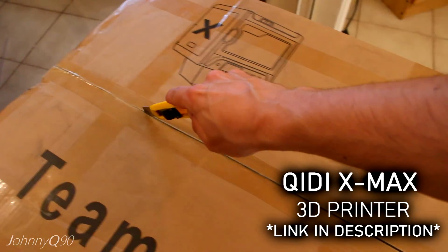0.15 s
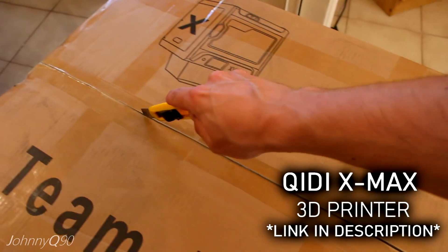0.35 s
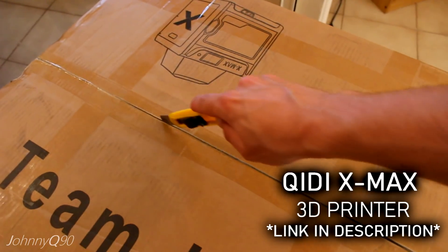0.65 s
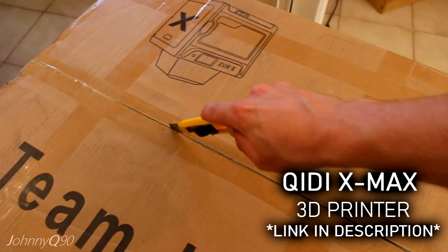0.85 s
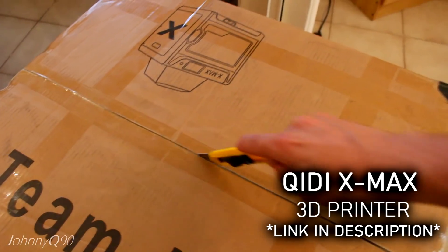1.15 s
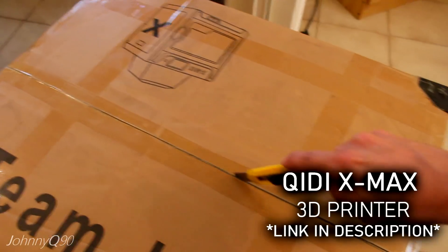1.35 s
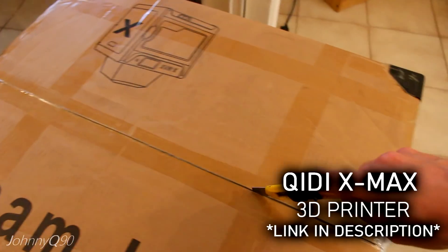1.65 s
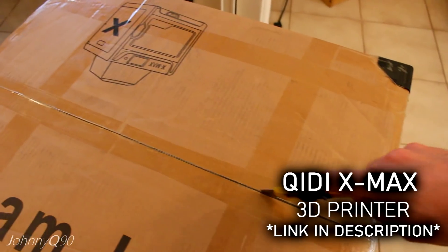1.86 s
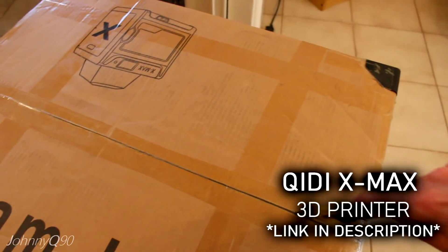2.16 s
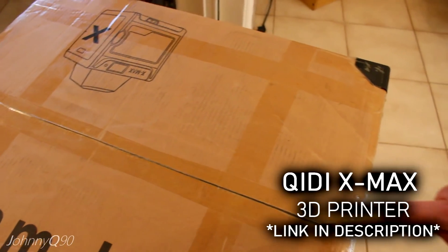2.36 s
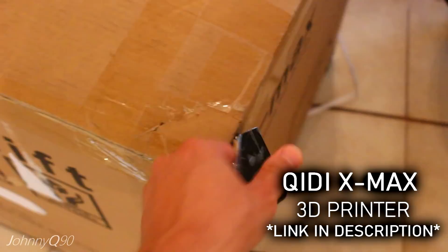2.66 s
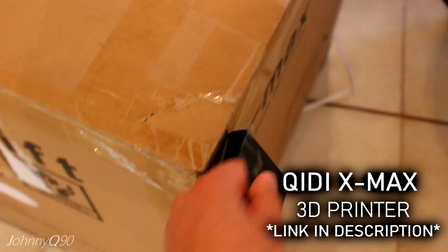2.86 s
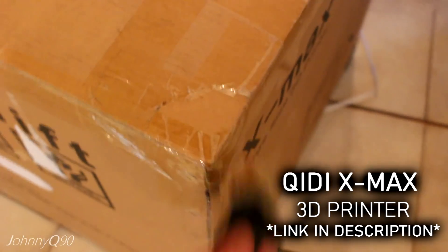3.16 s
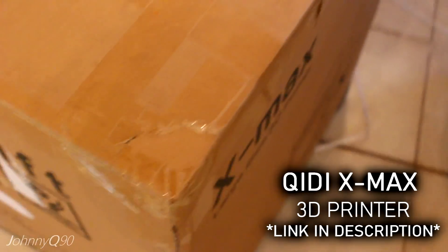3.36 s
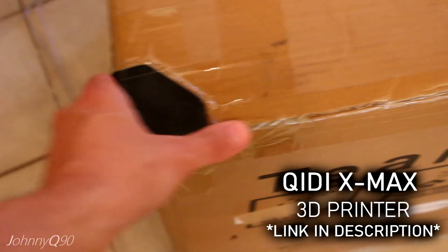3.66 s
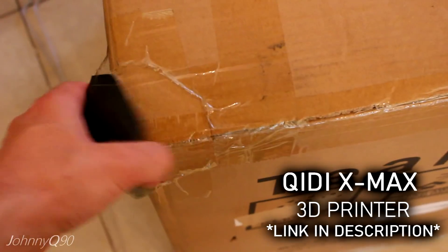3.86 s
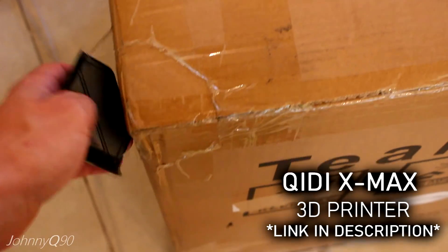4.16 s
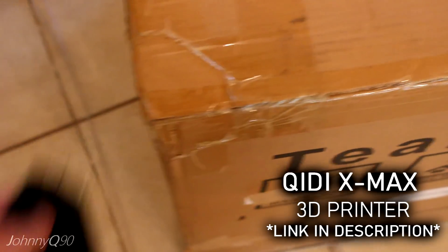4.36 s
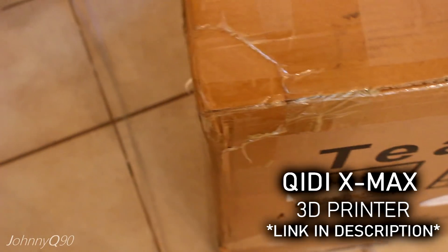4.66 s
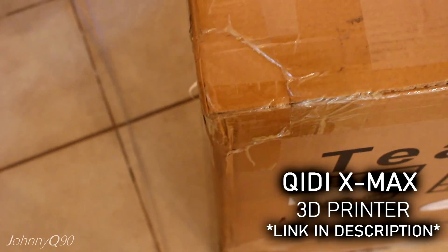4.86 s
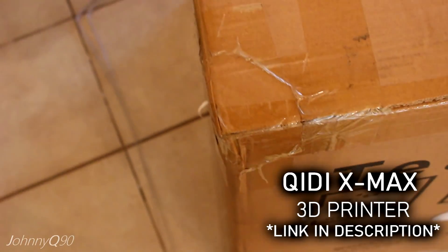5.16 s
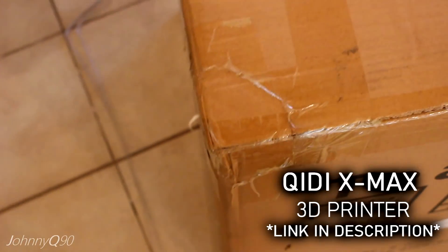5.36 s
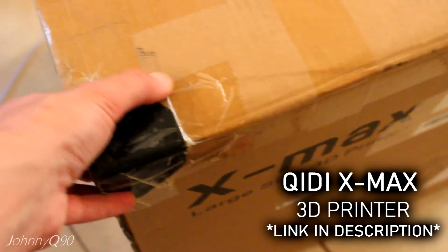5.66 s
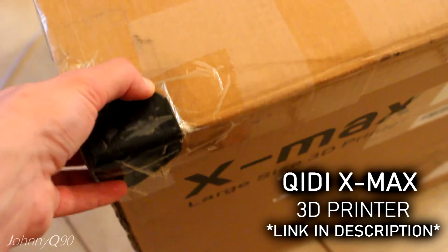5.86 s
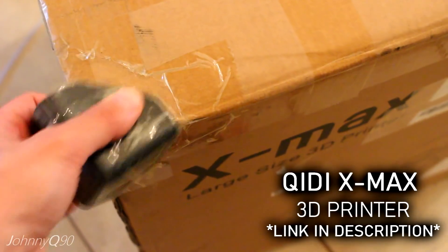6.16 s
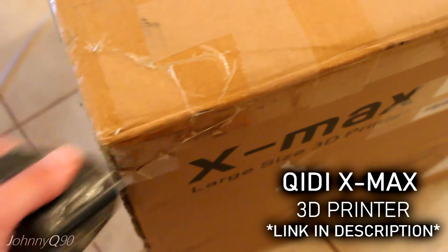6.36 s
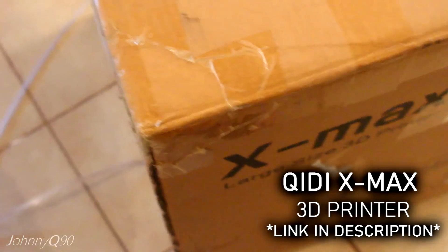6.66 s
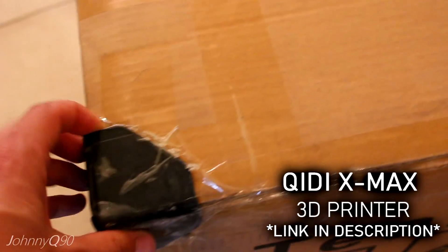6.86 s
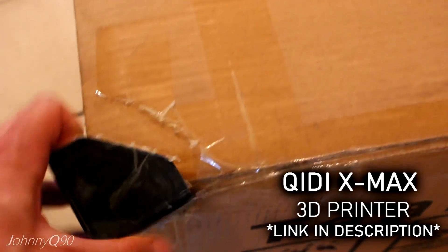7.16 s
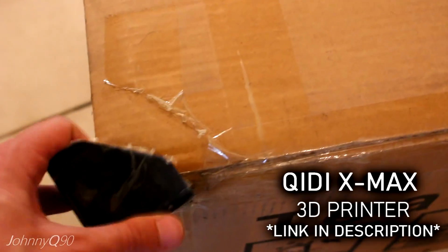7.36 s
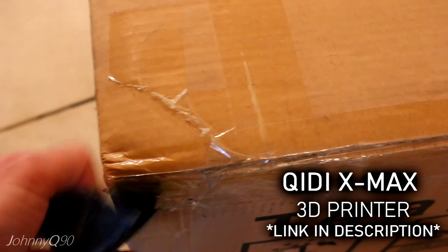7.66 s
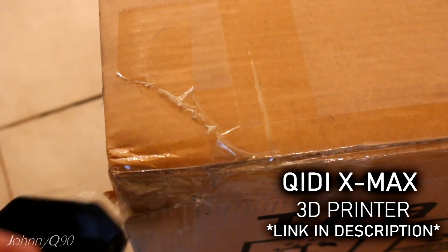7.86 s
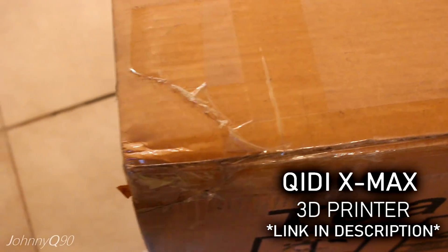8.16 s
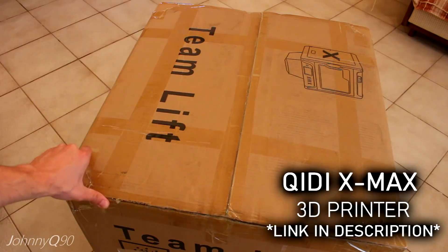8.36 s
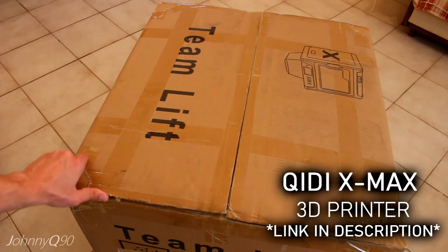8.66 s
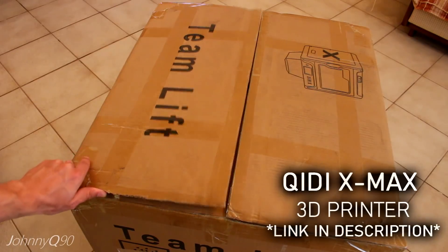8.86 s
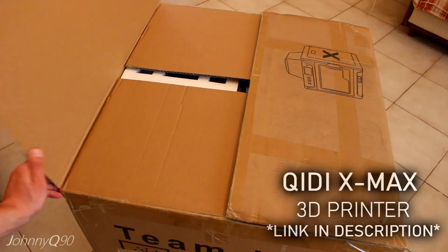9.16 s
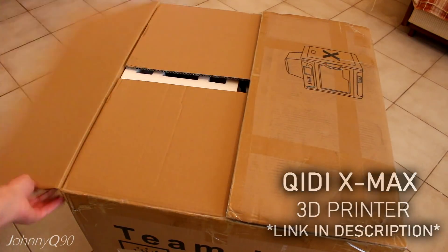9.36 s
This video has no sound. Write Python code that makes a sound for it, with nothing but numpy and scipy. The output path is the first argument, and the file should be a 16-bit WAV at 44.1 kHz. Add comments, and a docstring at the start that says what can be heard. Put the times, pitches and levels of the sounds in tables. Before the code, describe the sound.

In a small, slightly echoing tiled room, a blade rasps through packing tape and makes a large carton thrum. Next come close, crackling rips as four plastic corner protectors are pulled away one after another, some loud and some gentle, amid rustling tape and dull cardboard bumps. A flap then knocks and creaks open. Faint hiss and low rumble lie underneath.

```python
"""A knife slits the taped seam of a big cardboard carton in a tiled room: fibres and tape part in tiny
slips that make lid and blade ring. Four plastic corner guards are then torn off their packing tape in
bursts of sharp snaps, with crinkling tape and hollow knocks from the carton. Last, a flap is pulled
open and creaks. Faint hiss and rumble lie underneath. Five times the level dips briefly and the echo
is cut off."""
import sys
import numpy as np
from scipy import signal
from scipy.io import wavfile

SR = 44100
rng = np.random.default_rng(int(sys.argv[2]) if len(sys.argv) > 2 else 0)


def unload_wav(signal):
    """Save mono or channel-first audio to the path in sys.argv[1] as 16-bit WAV at rate SR, clipped to [-1, 1]."""
    wavfile.write(
        sys.argv[1],
        SR,
        np.round(np.clip(np.atleast_2d(signal).T, -1, 1) * 32767).astype(np.int16),
    )


N = 418950

# The tones that a guard, the tape film, its edge and the carton ring with: pitch_hz, width_hz, level_db
# (a wider tone dies away sooner)
GUARD_TONES = [(1159, 450, -7.5), (1646, 320, -3), (2070, 230, -7.5)]
FILM_TONES = [(2710, 1800, -4), (3750, 430, -3.5), (5070, 1700, 0.5), (5820, 610, -5)]
EDGE_TONES = [(7330, 470, -9), (8780, 440, -0.5), (11200, 5900, -12.5), (13400, 730, -9.5)]
CARTON_TONES = [(127, 34, -20), (187, 82, -10), (390, 200, -7.5), (674, 200, -4.5), (900, 320, -8.5)]
# Moments when the level dips and the echo stops: time_s
DIPS = [2.7256, 3.724, 5.628, 6.793, 8.296]


def amp(db):
    """Turn decibels into a gain to multiply by."""
    return 10 ** (np.asarray(db) / 20)


def unit_level(x):
    """Scale a signal to an average (rms) level of 1."""
    return x / np.sqrt(np.mean(x ** 2) + 1e-20)


def filtered(x, order, hz, kind):
    """Keep the "low" side, the "high" side or a "band" of a sound."""
    return signal.sosfilt(signal.butter(order, hz, kind, fs=SR, output="sos"), x)


def gain_curves(rows):
    """Join rows of a time and levels into gain curves, silent before and after."""
    times, *columns = np.transpose(rows)
    return [amp(np.interp(np.arange(N) / SR, times, db, left=-200, right=-200)) for db in columns]


def at_pitch(points, hz):
    """Read a value between the rows of a table, with pitch spaced in octaves."""
    pitches, values = np.transpose(points)
    return np.interp(np.log(hz), np.log(pitches), values)


def drift(rate_hz):
    """A smooth random wander, about 1 in size."""
    r = np.exp(-2 * np.pi * rate_hz / SR)
    return unit_level(signal.lfilter([1], [1, -2 * r, r * r], rng.standard_normal(N + SR))[SR:])


def ring(clicks, hz, width):
    """Each click starts a tone that dies away."""
    r, w = np.exp(-np.pi * width / SR), 2 * np.pi * hz / SR
    return signal.lfilter([.5, 0, -.5], [1, -2 * r * np.cos(w), r * r], clicks + 1e-18)


def resonate(drive, tones, wander_db):
    """Slips set an object's tones ringing; each slip grips each tone differently."""
    out = 0
    for hz, width, db in tones:
        strength = amp(db + wander_db * drift(3.0)) * width
        out += strength * ring(drive * rng.standard_normal(N), hz, width)
    return unit_level(out)


def slips(per_s, spread_db, clump_db, clump_hz):
    """Tiny random clicks of uneven size that swell in clumps."""
    sizes = amp(spread_db * np.minimum(rng.exponential(1, N), 4)) * rng.choice([-1, 1], N)
    happens = rng.random(N) < per_s / SR
    return unit_level(sizes * happens * amp(clump_db * drift(clump_hz)))


def strike(times, hit_db, tones, spread_db, detune, contact_s, ragged):
    """Each blow is a click with a ragged trail; every tone rings with its own strength and tuning."""
    starts, t = np.round(times * SR).astype(int), np.arange(2500) / SR
    out, luck = np.zeros(N + len(t)), rng.standard_normal((len(starts), len(tones), 92))
    for k, (hz, width, db) in enumerate(tones):
        contact = ragged * luck[:, k, 2:] * np.exp(-t[:90] / contact_s)
        contact[:, 0] = np.sign(contact[:, 0])
        pitch = np.minimum(hz * np.exp(detune * luck[:, k, 1:2]), .4 * SR)
        rings = np.exp(-np.pi * width * t) * np.cos(2 * np.pi * pitch * t)
        rings = signal.fftconvolve(rings, contact, axes=1)[:, :len(t)]
        strength = amp(hit_db + db + spread_db * luck[:, k, 0])
        np.add.at(out, starts[:, None] + np.arange(len(t)), strength[:, None] * rings)
    return out[:N]


def shaped_noise(length, gain_at):
    """Noise split into half-octave bands, each scaled by gain_at(hz)."""
    white, edges = rng.standard_normal((2, length)), 60 * 2 ** np.arange(0, 8.6, .5)
    bands = zip(edges, np.minimum(edges[1:], .47 * SR))
    return sum(gain_at(np.sqrt(low * high)) * filtered(white[k % 2], 3, [low, high], "band")
               for k, (low, high) in enumerate(bands))


def knife():
    """Fibres and tape part in dense slips; the ringing changes as the blade moves along the seam."""
    # Carton thrum, tape rasp and blade scratch: time_s, thrum_db, rasp_db, scratch_over_rasp_db
    slit = [(0.0, -49.5, -62.5, 3.5), (0.3, -51, -61, 4.5), (0.5, -47.5, -57, 1), (0.85, -49, -60.5, -3.5),
            (1.1, -52.5, -54, -6.5), (1.24, -44.5, -60, -2), (1.33, -46, -53.5, -4.5),
            (1.44, -50.5, -55.5, -1), (1.52, -49.5, -51.5, 0), (1.64, -48, -58, -4.5),
            (1.85, -50.5, -58.5, -5), (2.0, -43, -52.5, -1.5), (2.45, -48.5, -50, -3.5),
            (2.53, -50, -48, -3), (2.59, -39.5, -47, 3.5)]
    # The blade catches and tears through a cross strip: start_s, rise_s, thrum_db, scratch_db, rasp_db
    snags = [(1.137, 0.0036, -29, -63, -26.5), (1.147, 0.0028, -28, -45, -64),
             (1.167, 0.0046, -34, -69, -61), (1.653, 0.0013, -30.5, -39, -44),
             (2.595, 0.0025, -39, -36, -24)]
    # Tones of lid and blade at the two ends of the seam: pitch_hz, width_hz, level_db
    start_tones = [(94, 22, 11), (132, 39, 15.5), (378, 130, -0.5), (706, 630, -31), (1460, 720, -22.5),
                   (2380, 310, -11), (3100, 370, -11), (4600, 380, -24.5), (5650, 210, -22),
                   (6360, 1700, -41), (7700, 700, -26.5), (9180, 420, -22.5), (13300, 840, -31)]
    end_tones = [(172, 81, 0), (394, 62, 1), (620, 115, -3), (1450, 1540, -23.5), (2130, 150, -17.5),
                 (3610, 330, -17), (5050, 270, -20), (6220, 200, -16.5), (6500, 2900, -30.5),
                 (8430, 690, -19.5), (12900, 2500, -36)]
    # Pitch ranges of thrum, scratch and rasp: low_hz, high_hz
    ranges = [(60, 1000), (1000, 3400), (3400, 16000)]
    t = np.arange(N) / SR
    along = np.clip(t / slit[-1][0], 0, 1)
    thrum, rasp, scratch = gain_curves(slit)
    levels = np.array([thrum, rasp * scratch, rasp])
    for start_s, rise_s, *db in snags:
        rise = np.clip((t - start_s) / rise_s, 0, None)
        levels += amp(db)[:, None] * rise * np.exp(1 - rise)
    cutting = slips(per_s=9000, spread_db=2.1, clump_db=1.6, clump_hz=70)
    cutting += .6 * slips(per_s=120, spread_db=3.0, clump_db=2.5, clump_hz=10)
    out = 0
    for gain, (low, high) in zip(levels, ranges):
        start, end = (resonate(cutting, [tone for tone in tones if low < tone[0] < high], wander_db=3.6)
                      for tones in (start_tones, end_tones))
        out += gain * (np.sqrt(1 - along) * start + np.sqrt(along) * end)
    return out


def background():
    """Faint room hiss, and a lumpy rumble that drops away at the last dip."""
    # How the hiss is spread from bass to treble: pitch_hz, level_db
    hiss_shape = [(41, -32), (70, 0), (1140, -10), (1460, -7.5), (2010, -13), (11700, -14.5),
                  (15100, -25.5), (16500, -26.5)]
    hiss = unit_level(shaped_noise(N, lambda hz: amp(at_pitch(hiss_shape, hz))))
    rumble = unit_level(filtered(rng.standard_normal(N), 6, 35.2, "low"))
    rumble *= np.where(np.arange(N) < DIPS[-1] * SR, 1, amp(-22))
    return amp(-74) * hiss + amp(-70) * rumble


def carton_knocks():
    """Jolts make the carton wall ring; its two lowest tones give a hollow boom."""
    # Jolts to the wall: start_s, wall_db, boom_over_wall_db
    jolts = [(1.137, -18, -15), (1.651, -26.5, -9), (2.905, -24, -20), (3.178, -13.5, 0), (3.22, -7.5, -18),
             (3.287, -13.5, -20), (3.974, -45.5, 4), (4.227, -29.5, -4.5), (4.284, -25.5, -5),
             (5.514, -39, -11.5), (6.041, -34.5, 1), (7.158, -24, -9), (7.293, -28, -6.5), (7.787, -43, -6),
             (7.903, -30, -8), (7.932, -27.5, -10.5), (8.934, -22, 6), (8.992, -20.5, -0.5)]
    times, wall_db, boom_db = np.transpose(jolts)
    wall = strike(times, wall_db, CARTON_TONES[2:], spread_db=2.3, detune=.13, contact_s=.0008, ragged=.2)
    boom = strike(times, wall_db + boom_db, CARTON_TONES[:2],
                  spread_db=1.5, detune=.08, contact_s=.0008, ragged=.15)
    return filtered(wall + boom, 2, [110, 1400], "band")


def hand_effort():
    """How hard hands stir guard, film and wall: a rip holds and stops short, a fumble swells and fades."""
    # Tape tears off in one pull: start_s, length_s, film_db
    rips = [(2.833, 0.053, -51), (2.929, 0.075, -30.5), (3.22, .09, -26.5), (4.258, 0.034, -30.5),
            (7.172, 0.076, -47), (7.905, 0.032, -37), (8.938, 0.096, -45)]
    # Fingers work at guard and tape: middle_s, length_s, film_db, guard_over_film_db
    fumbles = [(2.778, 0.22, -61.5, -6.5), (3.772, 0.29, -70, -5.5), (3.96, 0.22, -57.5, -6),
               (4.15, .15, -67, -6.5), (5.57, .14, -80, 14), (5.785, .17, -70.5, 2.5),
               (6.025, 0.14, -60, 6), (6.23, 0.22, -59, -0.5), (6.414, .12, -64, -1), (6.809, .06, -71, -6),
               (6.95, .2, -73.5, 1.5), (7.073, 0.19, -76, 7.5), (7.43, 0.26, -64, -5.5),
               (7.579, 0.061, -56.5, 2), (7.653, 0.096, -57.5, -1.5), (7.787, .1, -54.5, 4),
               (8.73, .15, -61, -6.5), (8.87, 0.12, -62, -7.5), (9.171, 0.39, -60, -13),
               (9.466, 0.16, -60.5, -17)]
    rise_s, fall_s, swell_ends_db = .006, .008, -14.5
    t, effort = np.arange(N) / SR, 0
    for start_s, length_s, db in rips:
        nearest_end = np.minimum((t - start_s) / rise_s, (start_s + length_s - t) / fall_s)
        pull = np.exp(np.minimum(0, nearest_end))
        effort += amp([db - 4, db, db - 14])[:, None] * pull
    for middle_s, length_s, db, guard_db in fumbles:
        swell = amp(swell_ends_db * (2 * (t - middle_s) / length_s) ** 2)
        effort += amp([db + guard_db, db, db + guard_db - 3])[:, None] * swell
    return effort


def crinkle_and_creak():
    """Sticky film ticks and rubs, stirring guard and carton wall; the wall creaks as the flap bends."""
    # The bending flap: time_s, level_db
    flap_bend = [(8.88, -81), (8.96, -45), (9.1, -57), (9.4, -89.5), (9.5, -61)]
    guard_gain, film_gain, wall_gain = hand_effort()
    ticks = slips(per_s=300, spread_db=3.3, clump_db=3.5, clump_hz=30)
    rub = slips(per_s=9000, spread_db=2.1, clump_db=2.5, clump_hz=18)
    drive = 1.1 * ticks + rub
    wall = (wall_gain + gain_curves(flap_bend)[0]) * resonate(drive, CARTON_TONES, wander_db=2.0)
    guard = guard_gain * resonate(drive, GUARD_TONES, wander_db=3.0)
    film = film_gain * resonate(drive, FILM_TONES + EDGE_TONES, wander_db=2.5)
    return guard + film + wall


def tape_snaps():
    """Tape lets go in pops that briefly ring the guard, the film and its edge."""
    # Each pop (a brighter one has more edge and less guard): start_s, level_db, brightness_db
    pops = [(2.8162, -37.5, 15), (2.8332, -10.5, 14.5), (2.861, -5.5, 14), (2.9044, -5, 9),
            (2.9118, -2.5, 12), (2.9325, -0.5, 8), (2.9365, -12.5, 5), (2.952, -11, 7), (2.9617, -10.5, -3),
            (2.9697, -7.5, 2), (2.9792, -2, 11), (2.9874, -0.5, 32), (2.9923, -5, 16), (3.005, -4.5, 30),
            (3.022, -1.5, 4.5), (3.047, -13.5, 8), (3.0684, -12.5, 7), (3.1532, -3.5, 8.5),
            (3.1612, -18, 15.5), (3.178, 3.5, -6), (3.2196, 3.5, 1), (3.2286, -2.5, -2), (3.234, -12, 0),
            (3.2489, -15.5, 6.5), (3.2697, -15, -1), (3.2874, -11, 5.5), (3.3005, -16, -6),
            (3.5712, -36.5, 13.5), (3.7938, -33, 22.5), (3.8121, -34, 29.5), (3.874, -35.5, 12),
            (3.9012, -38.5, 2.5), (3.916, -35, 14), (3.956, -30, 27.5), (3.9745, -37, -8),
            (3.9847, -31.5, -8), (4.0586, -42, 2.5), (4.078, -48, -8), (4.1139, -36.5, 6),
            (4.1892, -35, 10), (4.2221, -31, 7), (4.2269, -10.5, -3.5), (4.236, -22, 23.5),
            (4.2522, -3, 11.5), (4.2568, -12, 3.5), (4.2694, -5.5, 7), (4.2739, -10.5, 1), (4.284, -5, 4),
            (4.3, -18, -8), (4.394, -35, 9), (5.5149, -36.5, -21), (5.6834, -47, 2.5), (5.9604, -47, 5.5),
            (5.9898, -41, -7), (5.9976, -34, -2), (6.0418, -26, 8.5), (6.056, -42.5, -2), (6.1822, -40, 13),
            (6.233, -41, -2), (6.2448, -31.5, -13), (6.3465, -41, -3), (6.9164, -42, 3),
            (6.9371, -25.5, 22.5), (7.1455, -44, 12.5), (7.1585, -14, -5.5), (7.1763, -11, 8),
            (7.194, -22, -2), (7.2032, -24, 5), (7.2333, -20.5, 8), (7.293, -21, -5.5), (7.537, -39, 10.5),
            (7.587, -23, -9), (7.7152, -32.5, 11), (7.7608, -36, -13), (7.7757, -37.5, -4),
            (7.7832, -39, -0.5), (7.839, -22.5, 11), (7.8459, -27, 13), (7.8722, -19, 21),
            (7.9014, -6.5, 13.5), (7.908, -7.5, 11.5), (7.9169, -13, 5.5), (7.9318, -16, -11),
            (8.6611, -29, 17), (8.865, -43, -7), (8.8885, -31.5, 6), (8.9164, -42, 3), (8.934, -22, -0.5),
            (8.9819, -20, -18), (8.9927, -16, -3), (9.2053, -37, 13), (9.263, -42, 17.5)]
    flap_damping = 1.9   # tape on the flap dies away this many times faster than on a guard
    times, level_db, bright_db = np.transpose(pops)
    guard_db = level_db - 2 - np.maximum(bright_db, 0)
    film_db = level_db - 3 - .3 * abs(bright_db)
    edge_db = level_db - 2.5 + np.minimum(bright_db, 0)
    on_flap, out = times > DIPS[-1], 0
    for chosen, damping in ((~on_flap, 1), (on_flap, flap_damping)):
        for hit_db, tones in ((guard_db, GUARD_TONES), (film_db, FILM_TONES), (edge_db, EDGE_TONES)):
            damped = [(hz, width * damping, db) for hz, width, db in tones]
            out += strike(times[chosen], hit_db[chosen], damped,
                          spread_db=1.5, detune=.06, contact_s=.00052, ragged=.22)
    return filtered(out, 2, 500, "high")   # a small film moves no bass


def tiled_room(dry):
    """One bounce off the floor tiles and a wash of echoes, cut off at each dip."""
    # Time the echo takes to fade by 60 dB: pitch_hz, fade_s
    fade_times = [(200, .36), (1400, .46), (4000, .43), (9000, .36), (13000, .24)]
    build_up_s, bounce_s = .0039, .0042
    t = np.arange(SR) / SR
    tail = shaped_noise(SR, lambda hz: amp(-60 * t / at_pitch(fade_times, hz)))
    tail *= np.clip(t / build_up_s, 0, 1)
    tail = filtered(tail, 1, 296, "high")   # walls swallow bass
    echo = amp(-10.5) * tail / np.sqrt(np.sum(tail ** 2))
    echo[0] += 1   # the direct sound
    echo[round(bounce_s * SR)] += amp(-18)
    cuts = [0] + [round(s * SR) for s in DIPS] + [N]
    return np.concatenate([signal.fftconvolve(dry[a:b], echo)[:b - a] for a, b in zip(cuts, cuts[1:])])


def scene():
    """All the sounds in the room, fading out and back in around each dip."""
    t, fade_s = np.arange(N) / SR, .0065
    dip = np.clip(np.min([abs(t - s) for s in DIPS], axis=0) / fade_s, 0, 1)
    unpacking = knife() + tape_snaps() + carton_knocks() + crinkle_and_creak()
    return ((tiled_room(unpacking) + background()) * dip)[None]


def record(dry):
    """The microphone softens one treble band, clips the loudest snaps and loses the very top."""
    band_hz, width_hz, share_lost, top_hz = 10190, 3000, .26, 16900
    r, w = np.exp(-np.pi * width_hz / SR), 2 * np.pi * band_hz / SR
    band = signal.lfilter([(1 - r * r) / 2, 0, (r * r - 1) / 2], [1, -2 * r * np.cos(w), r * r], dry)
    clipped = np.clip(dry - share_lost * band, -1, 1)
    return signal.sosfilt(signal.cheby2(14, 70, top_hz, fs=SR, output="sos"), clipped)


dry = scene()
out = record(dry)
unload_wav(out)
```